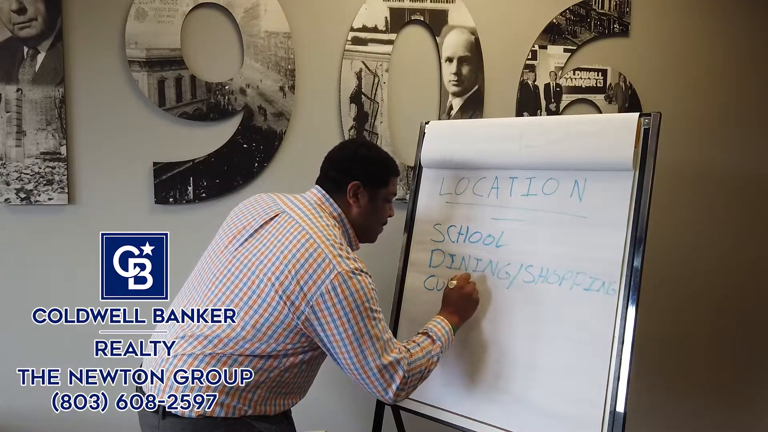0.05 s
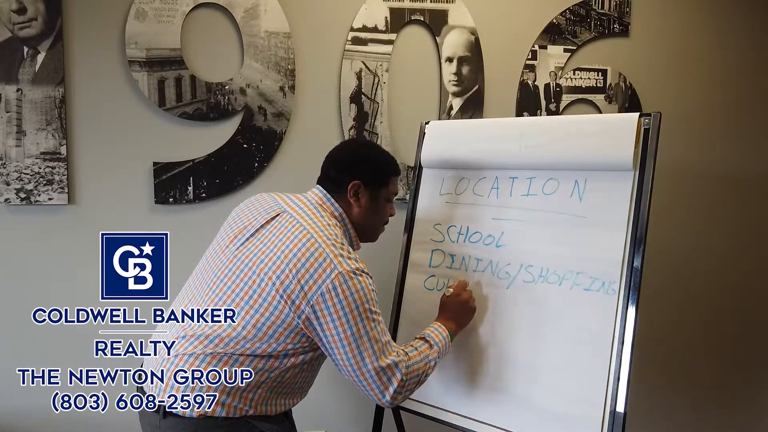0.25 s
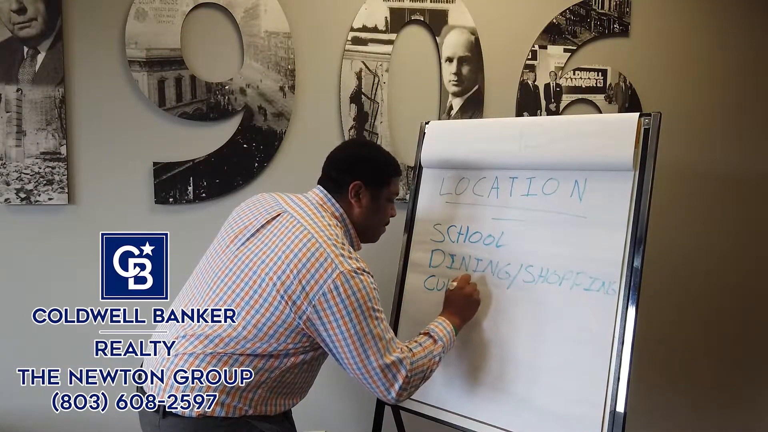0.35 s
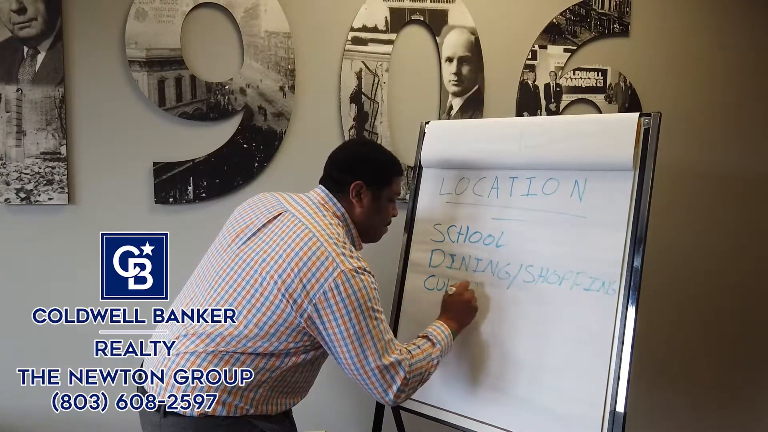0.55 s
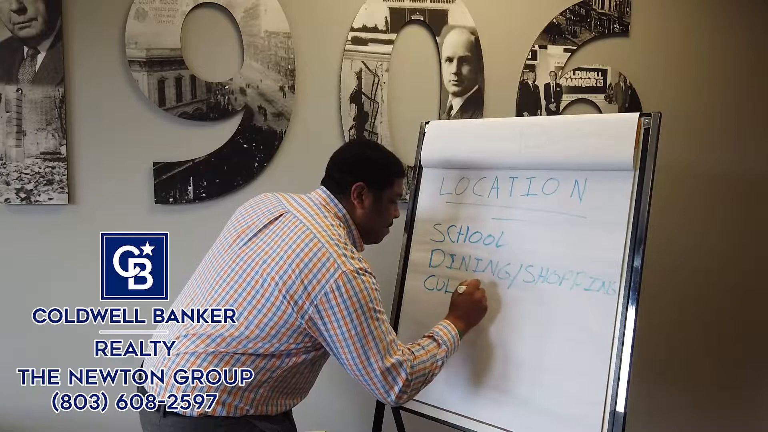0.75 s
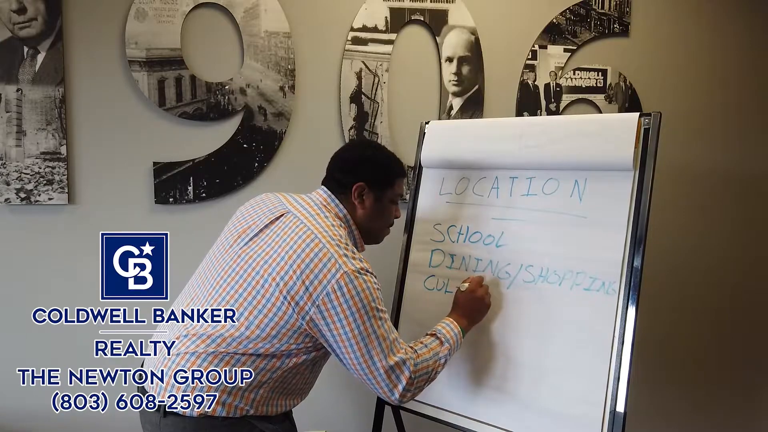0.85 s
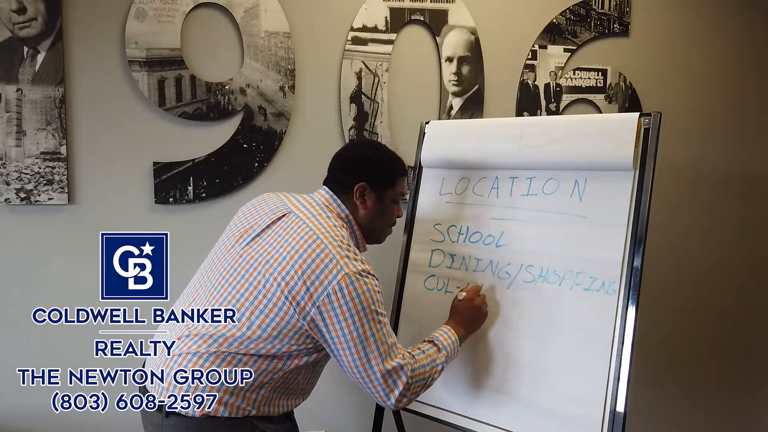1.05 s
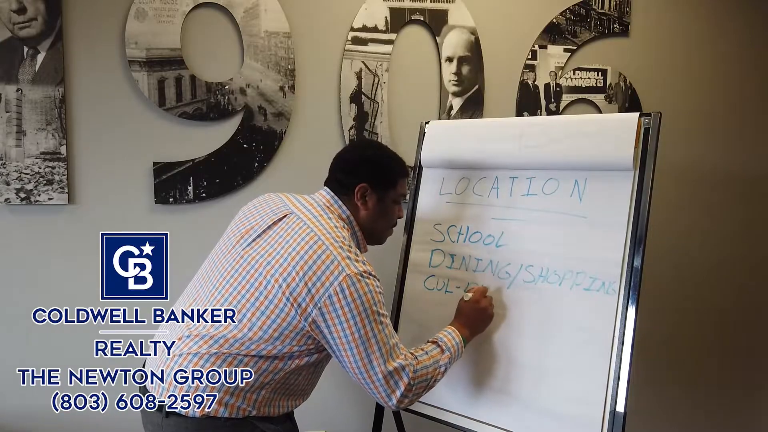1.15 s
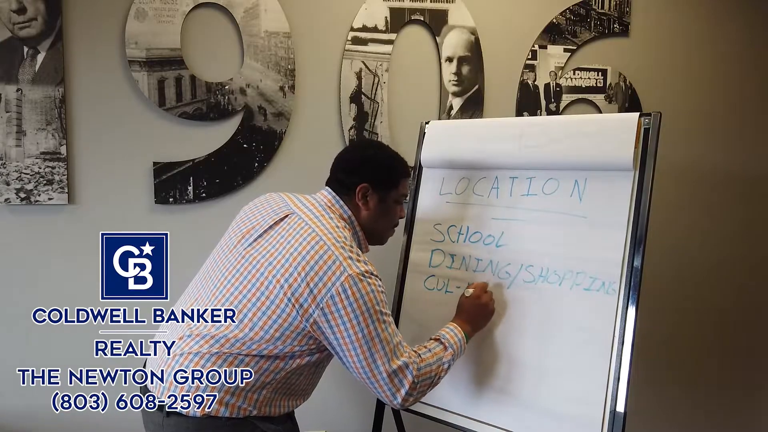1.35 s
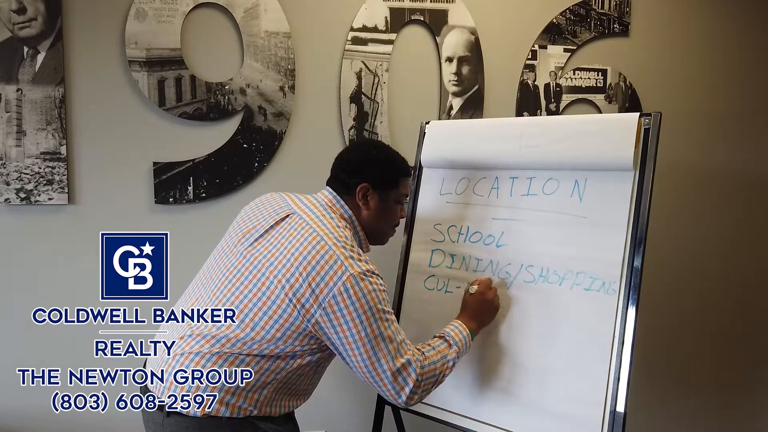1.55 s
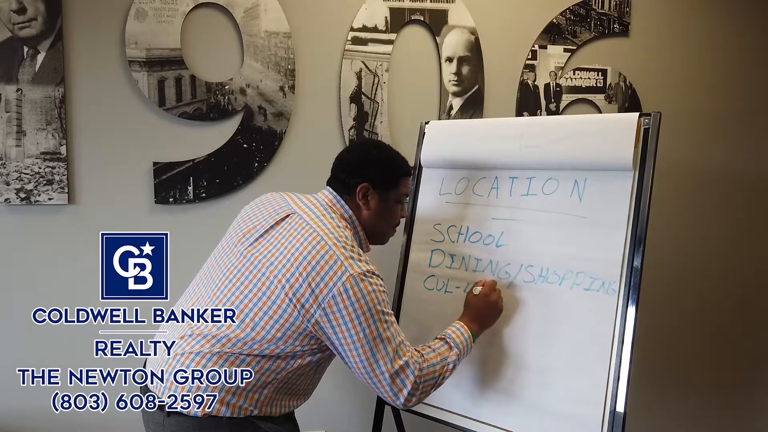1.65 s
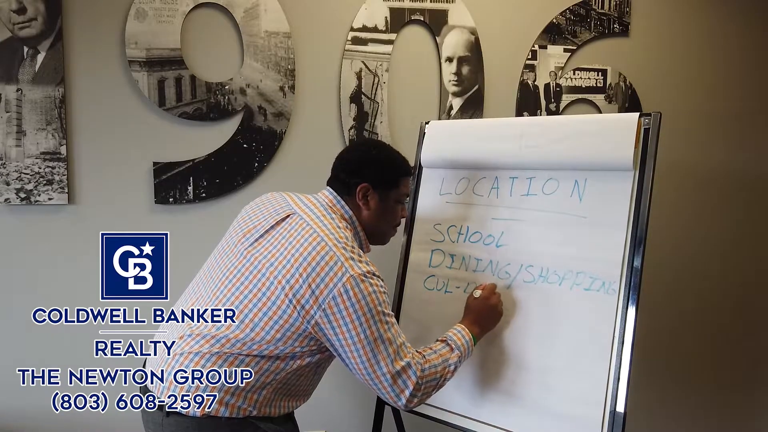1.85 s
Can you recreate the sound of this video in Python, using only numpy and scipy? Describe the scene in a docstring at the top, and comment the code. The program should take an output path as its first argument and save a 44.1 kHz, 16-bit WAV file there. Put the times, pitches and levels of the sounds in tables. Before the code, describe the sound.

A felt-tip marker scratches short uneven strokes on a paper pad over low ventilation hum

```python
"""A felt-tip marker writes a few letters on a paper pad on an easel, over the low rush and hum of ventilation.
Three strokes come from 0.19 to 0.73 s, four shorter ones from 0.99 to 1.67 s; then the ventilation runs on alone.
All but the third open with a soft knock of the pad. Dense tiny slips over the fibres hiss in the sheet and
rustle in the pad; within strokes, slips of fluttering level ring the nib in rough half-squeaks.
One snag ticks near 0.7 s; short noise-like reflections add the room."""
import sys
import numpy as np
from scipy import signal
from scipy.fft import rfft, irfft
from scipy.io import wavfile
from scipy.ndimage import uniform_filter1d

SR = 44100
rng = np.random.default_rng(int(sys.argv[2]) if len(sys.argv) > 2 else 0)


def bounce(signal):
    """Save signal as a 16-bit WAV file at the path given by the first command-line argument."""
    frames = np.transpose(np.atleast_2d(signal))
    limited = np.clip(frames, -1, 1)
    pcm = np.round(limited * 32767).astype(np.int16)
    wavfile.write(sys.argv[1], SR, pcm)


N = 83790


def undb(db):
    """Decibels to amplitude gain."""
    return 10 ** (np.asarray(db) / 20)


def unit(x):
    """Scale to rms 1 over the whole signal."""
    return x / np.sqrt(np.mean(x ** 2) + 1e-20)


def colour(x, points, tilt_db_per_octave=0):
    """Filter by (frequency [Hz], level [dB]) points, interpolated over log frequency, plus a tilt."""
    hz = np.maximum(np.fft.rfftfreq(N, 1 / SR), 1)
    points = np.array(points)
    level_db = np.interp(np.log(hz), np.log(points[:, 0]), points[:, 1])
    tilt_db = tilt_db_per_octave * np.log2(hz / 6000)  # pivots at 6 kHz
    return irfft(rfft(x) * undb(level_db + tilt_db), N)


def ring(x, hz, width_hz):
    """A resonance applied twice, for steep skirts (width of one pass); rms 1."""
    b, a = signal.iirpeak(hz, hz / width_hz, fs=SR)
    once = signal.lfilter(b, a, x)
    return unit(signal.lfilter(b, a, once))


def walk(points_per_s):
    """Smooth random wander of rms 1: held random values under a moving average."""
    hold = max(int(SR / points_per_s), 1)
    values = rng.standard_normal(N)[:N // hold + 1]
    return unit(uniform_filter1d(np.repeat(values, hold), hold)[:N])


def slips():
    """Dense tiny jerks of uneven size and random sign as felt catches and frees paper fibres; rms 1."""
    slips_per_s, spread_db = 9000, 2.5
    hit = rng.random(N) < slips_per_s / SR
    sign = np.sign(rng.standard_normal(N))
    size = undb(spread_db * rng.standard_normal(N))
    return unit(hit * sign * size)


def ventilation():
    """Steady coloured noise for the air, narrow noise bands for the wavering hum; independent side noise."""
    # air spectrum: (frequency [Hz], level [dB])
    air_points = [(15, -7), (40, -3), (56, -9.5), (80, -7.5), (130, -8), (180, -2), (250, -6.5), (400, -11),
                  (540, -15), (730, -12), (1050, -17), (1500, -24.5), (2300, -27.5), (4000, -32),
                  (8000, -33.5), (15000, -40.5)]
    # side level relative to the air: (frequency [Hz], level [dB])
    side_points = [(60, -40), (250, -47), (700, -32.5), (1300, -31.5), (2400, -16), (4400, -10.5),
                   (15000, -6)]
    # hum bands: (frequency [Hz], width at half amplitude [Hz], level [dB])
    hum_bands = [(54, 1.9, -65.5), (235.4, 5.4, -66), (334.9, 14, -66.5)]
    air_db = -56

    mid = undb(air_db) * unit(colour(rng.standard_normal(N), air_points))
    side_air = undb(air_db) * unit(colour(rng.standard_normal(N), air_points))
    side = colour(side_air, side_points)
    bin_hz = np.fft.rfftfreq(N, 1 / SR)
    for hz, width_hz, db in hum_bands:
        band_gain = 1 / (1 + (2 * (bin_hz - hz) / width_hz) ** 2)
        hum = irfft(rfft(rng.standard_normal(N)) * band_gain, N)
        mid = mid + undb(db) * unit(hum)
    return np.array([mid + side, mid - side])


def landings(t):
    """A soft, quickly damped knock as the felt meets the stack of paper."""
    # nib landings: (time [s], level before the envelope [dB])
    landing_table = [(0.197, -50.5), (0.377, -52), (1.003, -46.5), (1.173, -54.5), (1.423, -50),
                     (1.600, -50.5)]
    # knock of the pad: (frequency [Hz], level [dB])
    knock_points = [(150, -11), (400, -7), (700, -2), (1100, 0), (1500, -2), (2100, -3), (2700, -11),
                    (6000, -24)]
    rise_s, decay_s = 0.0059, 0.022

    out = np.zeros(N)
    for at_s, db in landing_table:
        age_s = np.maximum(t - at_s, 0)
        envelope = np.minimum(age_s / rise_s, 1) * np.exp(-age_s / decay_s)
        out += undb(db) * envelope * unit(colour(slips(), knock_points))
    return out


def snags(t):
    """A short catch of the nib makes the sheet tick: one resonance under a brief pulse."""
    # catches of the nib: (time [s], level [dB])
    snag_table = [(0.6953, -40.5)]
    ring_hz, width_hz, peak_after_s = 4720, 880, 0.003

    out = np.zeros(N)
    for at_s, db in snag_table:
        age = np.maximum(t - at_s, 0) / peak_after_s
        out += undb(db) * age * np.exp(1 - age) * ring(slips(), ring_hz, width_hz)
    return out


def squeaks(t):
    """Slips of fluttering level ring the resonances of the nib and rasp in the pad."""
    # squeaks: (start [s], end [s], pitch [Hz], level [dB], upper resonances [dB],
    #           pad relative to nib [dB])
    squeak_table = [ (0.48, 0.575, 6710, -40, -0.5, -12), (0.61, 0.691, 6460, -34.5, -1.5, -17),
                    (1.175, 1.238, 6300, -40, -2, -19), (1.205, 1.273, 6500, -45.5, 4, -12.5),
                    (1.42, 1.482, 6030, -43, 4, -20), (1.597, 1.655, 6080, -45, 5, -33), ]
    # nib resonances above the lowest: (ratio to the pitch, width [Hz], level [dB])
    upper_modes = [(1.115, 970, -5.5), (1.375, 1010, -9), (1.74, 1330, -19.5)]
    # rasp of the pad: (frequency [Hz], level [dB])
    rasp_points = [(200, -20), (600, -5), (1100, -3), (1400, 0), (1750, 2), (2200, 7.5), (2600, -9),
                   (3400, -1), (6000, -20)]
    lowest_width_hz, arch_power = 830, 0.76
    chatter_per_s, chatter_db = 890, 1

    out = np.zeros(N)
    for start_s, end_s, hz, db, upper_db, pad_db in squeak_table:
        along = np.clip((t - start_s) / (end_s - start_s), 0, 1)
        arch = np.maximum(np.sin(np.pi * along), 0) ** arch_power
        chatter = undb(chatter_db * walk(chatter_per_s))
        nib = ring(chatter * slips(), hz, lowest_width_hz)
        for ratio, width_hz, mode_db in upper_modes:
            mode = ring(chatter * slips(), hz * ratio, width_hz)
            nib = nib + undb(upper_db + mode_db) * mode
        rasp = unit(colour(chatter * slips(), rasp_points))
        out += undb(db) * arch * (unit(nib) + undb(pad_db) * rasp)
    return out


def shifting(x):
    """The colour wanders as the nib travels: overlapping bands swell and sink independently."""
    # band centres: [Hz]
    centres_hz = [1800, 3300, 4300, 5300, 6400, 7600, 9000, 10500]
    shift_db, shift_per_s = 1.3, 22

    bin_hz, spectrum = np.fft.rfftfreq(N, 1 / SR), rfft(x)
    out = np.zeros(N)
    for weights in np.eye(len(centres_hz)):
        band = irfft(spectrum * np.interp(bin_hz, centres_hz, weights), N)
        out += band * undb(shift_db * walk(shift_per_s))
    return out


def strokes(t):
    """Each stroke presses in, drags and lifts: slips make the sheet hiss and ring, the pad rustle, the easel rumble."""
    # strokes: (touch [s], lift [s], rise [s], fall [s], hiss [dB], fade by the lift [dB],
    #           swell halfway [dB], hiss tilt [dB per octave], sheet ring relative to hiss [dB],
    #           pad [dB], easel [dB])
    stroke_table = [ (0.194, 0.346, 0.028, 0.015, -45.5, -1, .5, -3.5, -4, -58, -76),
                    (0.375, 0.591, 0.02, 0.028, -41.5, -5, 0, -1, -4, -56.5, -55),
                    (0.544, 0.726, 0.061, 0.025, -41, -4.5, 2, -1.5, -8, -55, -59.5),
                    (0.993, 1.127, 0.024, 0.034, -41, -0.5, -2.5, -0.5, -6.5, -52, -69),
                    (1.168, 1.286, 0.021, 0.025, -41.5, -16.5, 4.5, -3, -6.5, -57, -76),
                    (1.421, 1.498, 0.014, 0.028, -44, 0.5, 0, -2.5, -7.5, -55, -86),
                    (1.600, 1.668, .006, 0.047, -45.5, 2.5, 0, -2, -33, -55.5, -86), ]
    # hiss of the sheet: (frequency [Hz], level [dB])
    sheet_points = [(1500, -27), (2750, -18), (3600, -10), (4150, -4), (5200, -4), (5700, -7), (6250, -3),
                    (7300, -4), (8400, -7), (9000, -4.5), (10000, -5.5), (11000, -13), (12000, -22),
                    (13000, -31), (15500, -37)]
    # rustle of the pad: (frequency [Hz], level [dB])
    pad_points = [(150, -5.5), (300, -28.5), (550, -4.5), (1050, 2), (1350, -3.5), (1800, 0.5),
                  (2150, -2.5), (2600, -12), (3300, 0.5), (6000, -64)]
    # rumble of the easel under the moving hand: (frequency [Hz], level [dB])
    easel_points = [(12, -36), (30, -14), (55, -2), (110, -3), (260, -5), (450, -25), (1500, -70)]
    sheet_ring_hz, sheet_ring_width_hz = 4830, 800
    drag_db, drag_per_s = 0.43, 75

    out = np.zeros(N)
    for (touch_s, lift_s, rise_s, fall_s, hiss_db, fade_db, swell_db, tilt_db_per_octave,
         ring_db, pad_db, easel_db) in stroke_table:
        age_s = np.maximum(t - touch_s, 0)
        along = np.minimum(age_s / (lift_s - touch_s), 1)
        press = np.sin(np.pi / 2 * np.clip(age_s / rise_s, 0, 1)) ** 2
        release = np.clip((lift_s - t) / fall_s, 0, 1)
        drag = drag_db * walk(drag_per_s)
        contact = press * release * undb(fade_db * along + swell_db * np.sin(np.pi * along) + drag)

        jerks = slips()  # shared by hiss and easel
        hiss = unit(colour(jerks, sheet_points, tilt_db_per_octave))
        sheet_ring = ring(slips(), sheet_ring_hz, sheet_ring_width_hz)
        sheet = undb(hiss_db) * (hiss + undb(ring_db) * sheet_ring)
        pad = undb(pad_db) * unit(colour(slips(), pad_points))
        easel = undb(easel_db) * unit(colour(jerks, easel_points))
        out += contact * (sheet + pad + easel)
    return shifting(out)


def room(x, t):
    """Quick reflections off easel and writer, a faint room tail and a slight widening, all by decaying noise."""
    # side level of the writing: (frequency [Hz], level [dB])
    side_points = [(400, -30), (4400, -21.5), (8000, -17.5), (12000, -10)]
    early_decay_s, early_db = 0.0053, -10
    t60_s, tail_db = 0.26, -17
    side_decay_s = 0.0076

    def echo(decay_s):
        """Convolve with decaying noise of unit energy."""
        response = rng.standard_normal(N) * np.exp(-t / decay_s)
        return signal.fftconvolve(x, response / np.linalg.norm(response))[:N]

    early = undb(early_db) * echo(early_decay_s)
    tail = undb(tail_db) * echo(t60_s / np.log(1000))
    mid = x + early + tail
    side = colour(echo(side_decay_s), side_points)
    return np.array([mid + side, mid - side])


def scene():
    """The marker in the room, over the ventilation."""
    t = np.arange(N) / SR
    marker = landings(t) + snags(t) + squeaks(t) + strokes(t)
    return ventilation() + room(marker, t)


def record(dry):
    """The recorder cuts the top with a steep elliptic low-pass."""
    top_hz, ripple_db, stop_db = 15700, 0.2, 70
    low_pass = signal.ellip(8, ripple_db, stop_db, top_hz, fs=SR, output="sos")
    return signal.sosfilt(low_pass, dry)


dry = scene()
out = record(dry)
bounce(out)
```